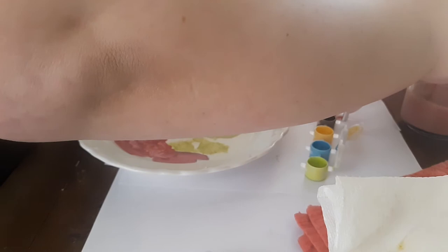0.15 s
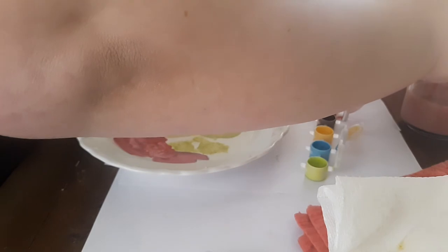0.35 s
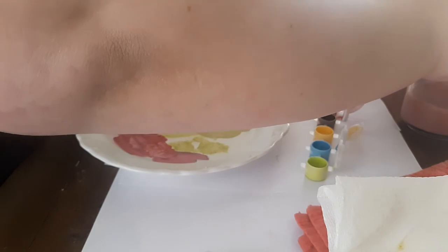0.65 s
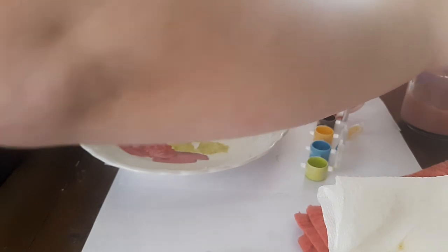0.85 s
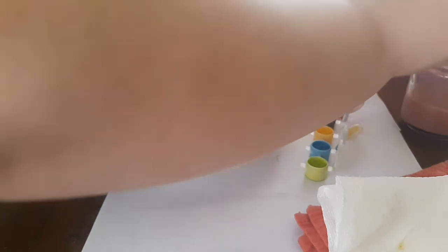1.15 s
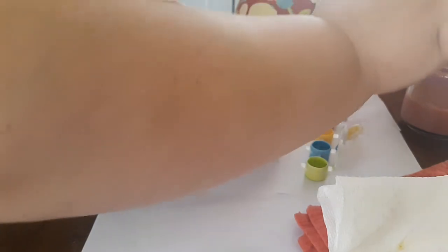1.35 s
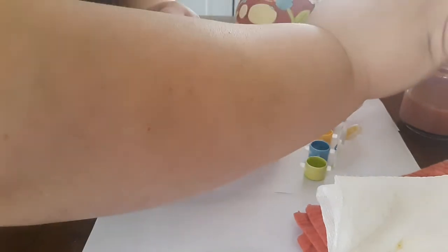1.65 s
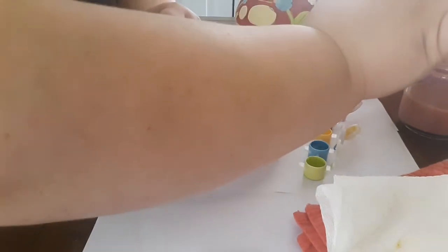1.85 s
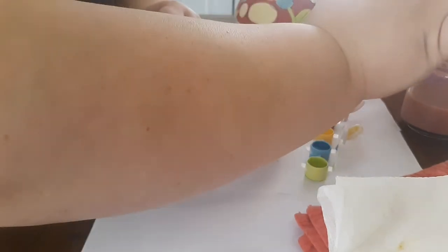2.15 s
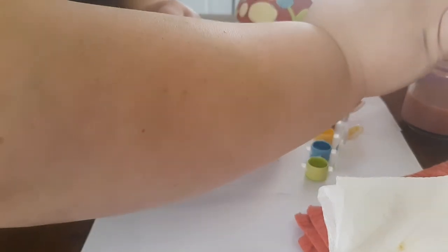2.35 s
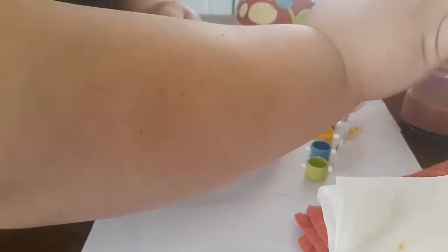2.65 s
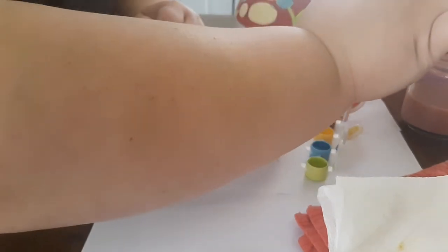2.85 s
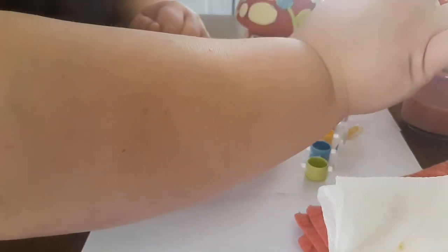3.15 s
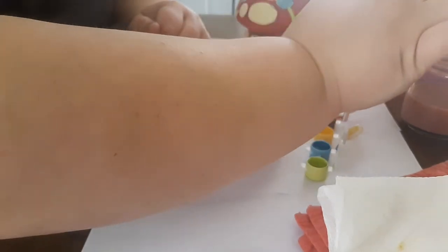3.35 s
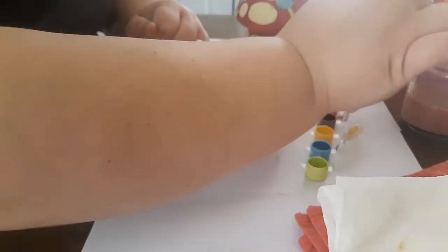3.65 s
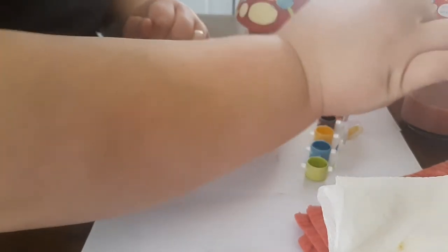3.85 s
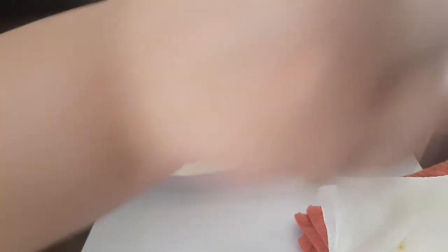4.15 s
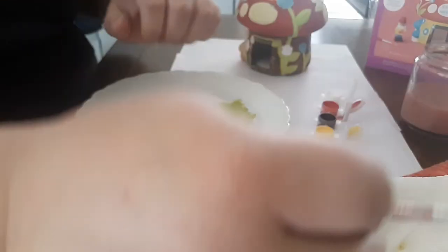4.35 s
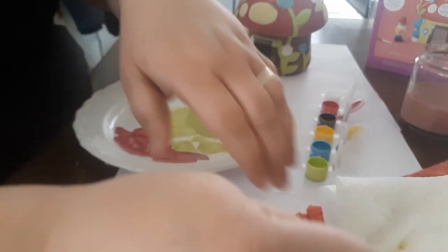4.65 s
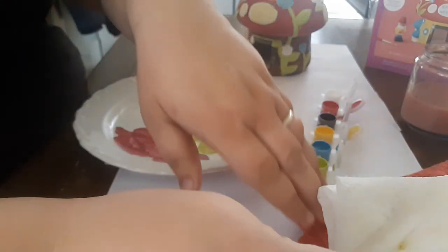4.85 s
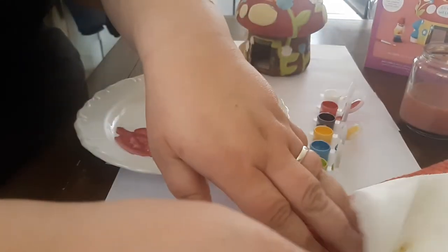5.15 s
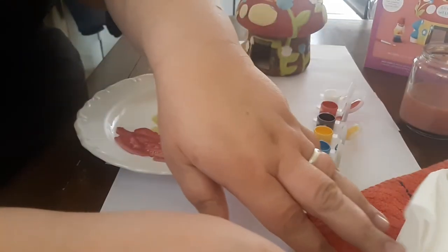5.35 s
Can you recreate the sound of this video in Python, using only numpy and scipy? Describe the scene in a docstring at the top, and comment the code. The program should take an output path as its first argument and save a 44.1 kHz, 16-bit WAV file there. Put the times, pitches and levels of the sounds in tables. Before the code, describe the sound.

Close to a phone in a small, quiet room, a brush swishes faintly in a jar of water. After a pause come six ringing taps on the glass rim, the last ones softer. A loud wooden knock follows, then duller bumps, a quick juddering of soft thuds, a low dragging rumble, a faint rubbing tone and light paper rustles.

```python
"""Rinsing a brush and bumping a table

A paintbrush swishes in a glass jar of rinse water (contact noise exciting wet modes and bubbles), then
taps the rim six times (decaying glass modes, a tick and a shaken table). Something put down knocks on the
wooden table (bending wave and modes); an arm bumps, judders and slides (pulses and shaped noise), and a
paper towel rustles (fluctuating noise). A phone close by hears it in a small, quiet room."""
import sys
import numpy as np
from scipy import signal
from scipy.fft import rfft, irfft
from scipy.io import wavfile
from scipy.ndimage import uniform_filter1d

SR = 44100
rng = np.random.default_rng(int(sys.argv[2]) if len(sys.argv) > 2 else 0)


def int16_out(signal):
    """Quantize to a 16-bit WAV file."""
    q = np.round(np.clip(np.atleast_2d(signal).T, -1, 1) * 32767)
    wavfile.write(sys.argv[1], SR, q.astype(np.int16))


N = 242753  # length in samples
TIME = np.arange(N) / SR
RING = TIME[:SR * 3 // 4]  # time axis of one decaying response, s

# Background spectrum of the room. Each row: frequency in Hz, relative level in dB.
ROOM_SPECTRUM = [(25, -20), (50, -5.5), (70, -0.5), (110, 0.5), (180, -2), (240, -6.5), (350, -6.5),
                 (430, -13.5), (550, -14), (750, -24.5), (1100, -26), (2000, -31), (5000, -31.5),
                 (15500, -35)]
ROOM_TONE_DB = -63
# Reverberation time of the room. Each row: frequency in Hz, t60 in s.
ROOM_DECAY = [(150, 0.41), (600, 0.25), (2500, 0.14), (9000, 0.22)]
TOP_HZ = 15800  # upper limit of the phone

# Brush strokes inside the jar. Each row: start in s, level in dB, bubble frequency in Hz, decay in s.
BRUSH_STROKES = [(0.009, -60, 1590, 0.017), (.165, -63, 2350, 0.018), (0.176, -67, 5290, 0.025),
                 (.189, -60.5, 2540, 0.0035), (0.2535, -47.5, 3080, 0.0027), (.370, -63.5, 3980, 0.036),
                 (0.4524, -53.5, 3140, 0.00043), (0.564, -70, 3420, 0.021), (0.626, -66, 4010, 0.023)]
# Jar and brush touching under water. Each row: nominal frequency in Hz, nominal level in dB, t60 in s.
WET_JAR_MODES = [(1060, -0.5, 0.038), (1510, -7.5, 0.068), (1960, -10.5, 0.035), (2410, -8, 0.017),
                 (3050, 11.5, 0.029), (3102, 7.5, 0.023), (3550, -14, 0.028), (3690, 0, 0.046),
                 (4140, -7, 0.059), (5400, -18, 0.0084), (6100, -16, 0.016)]

# Taps on the rim. Each row: start in s, level in dB, gain of the side modes in dB, gain of the top modes
# in dB, table shake in dB, time until the handle settles in s, dip on settling in dB.
RIM_TAPS = [(1.4696, -28.5, -1, 3, -4.5, 0.051, -1), (1.9159, -30.5, 12.5, 7.5, -3, 0.028, -2.5),
            (2.108, -29.5, 3, 2.5, -10, 0.034, -8), (2.4137, -31, 1, 8, -8.5, 0.081, -24),
            (3.0086, -35.5, 0.5, 8, -8, 0.0814, -29), (3.4291, -36.5, 4, 10, -2.5, 0.047, -9.5)]
# Ring of the jar, partly in close pairs that beat. Each row: nominal frequency in Hz, nominal level in dB,
# t60 in s, share of the side gain that depends on the spot struck (0 to 1).
GLASS_MODES = [(3254, -2, .26, 0), (3290, -19, .13, 0), (5017, -24, .13, .8), (6244, -25, .14, 0),
               (6755, -29, .13, 1), (6979, -23, .13, 1), (8432, -10, .15, 0), (8560, -22, .08, 0),
               (9904, -31, .13, .5), (10657, -17, .13, 0), (10690, -15, .13, .3)]
# Tick of the handle on the glass. Each row: frequency in Hz, relative level in dB.
TICK_SPECTRUM = [(150, -5.5), (400, -2), (800, -19), (1150, -6), (1700, -17), (3000, 0), (5000, -12.5),
                 (9000, -2.5), (11500, -9.5), (15000, -32)]

# Hard blows on the table. Each row: start in s, thud in dB, knock in dB, top of the knock in Hz, room in dB.
TABLE_BLOWS = [(3.5556, 19, -3.5, 4730, -10), (3.567, 3, -5.5, 1160, -4.5), (3.645, -0.5, -25, 1510, -8),
               (3.8489, 11.5, -5.5, 1530, -0.5), (4.1634, 5, -18.5, 2390, -7),
               (4.209, -16, -18, 2740, -4.5), (4.3519, 1, -12, 810, 0.5)]
# Ring of the table top. Each row: frequency in Hz, relative level in dB, t60 in s.
WOOD_MODES = [(136.8, -3.5, 0.34), (192.2, -1, 0.18), (231.7, 4.5, 0.15), (349.3, 4.5, 0.19),
              (383, -4, 0.16), (544.7, 0.5, 0.18), (720, 0, 0.18), (866, 5, 0.14), (1135, 13, 0.071),
              (1290, 10, 0.077), (2226, 7.5, 0.093), (2694, 14, 0.069), (4017, 6, 0.044)]
# Short ring of the thing put down. Each row: frequency in Hz, relative level in dB, t60 in s.
OBJECT_MODES = [(1980, -21, 0.019), (2260, -12, 0.028), (3757, 2.5, 0.018), (6380, -6, 0.0099)]
# Colour of a hard blow above its thud. Each row: frequency in Hz, relative level in dB.
KNOCK_SPECTRUM = [(750, 2), (1200, 0.5), (1700, -6), (2300, 0), (3000, 0), (3700, 0.5), (5000, -1.5),
                  (6500, 1), (9000, 5), (14000, -12)]
THUD_HZ = 216

# Spectrum of the dragging arm. Each row: frequency in Hz, relative level in dB.
DRAG_SPECTRUM = [(60, -20), (110, -8.5), (160, 1), (240, 2.5), (315, 0.5), (480, -5), (750, -22.5),
                 (1500, -38), (4000, -59)]
# Spectrum of rustling paper. Each row: frequency in Hz, relative level in dB.
PAPER_SPECTRUM = [(300, -26), (800, -6.5), (1250, 3.5), (1700, -2.5), (2500, -2), (5000, -6.5),
                  (7000, -10.5), (14000, -28)]
# The arm stays on the table from here on, with a steady rumble and a faint hiss of skin on paper.
DRAG_FROM_S, DRAG_ATTACK_S, DRAG_DB, SKIN_DB = 3.715, 0.095, -62, -81
# Shoves of the arm, swells of rumble. Each row: peak in s, level in dB, half length in s.
ARM_SHOVES = [(4.1, -58, 0.14), (5.34, -61, 0.2)]
# Wipes over paper and towel, swells of rustle. Each row: peak in s, level in dB, half length in s.
PAPER_WIPES = [(4.16, -69, 0.066), (4.95, -75.5, 0.043), (5.085, -68.5, 0.02), (5.4, -73, 0.065)]
# A faint rubbing tone grows as the hand slides, and dies when it stops.
RUB_FROM_S, RUB_TO_S, RUB_DB, RUB_GROWTH_DB_PER_S, RUB_RELEASE_S = 4.51, 4.82, -60, 31, 0.055

# The arm sticks and slips in a quick train of soft thuds. Each row: time in s, level in dB.
ARM_SLIPS = [(3.974, -29), (4.020, -25.5), (4.064, -36), (4.104, -31.5)]
# Scuff of skin on the table. Each row: frequency in Hz, relative level in dB.
SCUFF_SPECTRUM = [(60, -27), (150, -11.5), (380, 6.5), (750, -16), (1200, -16), (1700, -28.5), (5000, -40),
                  (14000, -63)]


def undb(db):
    """Level law: an amplitude gain is ten to the power of decibels over twenty."""
    return 10 ** (np.asarray(db) / 20)


def unit(x):
    """Normalisation: division by the root mean square gives unit power."""
    return x / np.sqrt(np.mean(x ** 2))


def fade(t60):
    """Exponential decay: the amplitude is 60 dB down after t60 seconds."""
    return np.exp(-np.log(1000) * RING / t60)


def on_log(hz, points):
    """Interpolation of (Hz, value) points on a logarithmic frequency axis."""
    f, value = np.transpose(points)
    return np.interp(np.log(np.maximum(hz, 1)), np.log(f), value)


def colour(x, points):
    """Minimum-phase filtering: a folded cepstrum turns a (Hz, dB) magnitude into a causal response."""
    size = 4096
    magnitude = undb(on_log(np.fft.rfftfreq(size, 1 / SR), points))
    cepstrum = irfft(np.log(magnitude))
    cepstrum[1:size // 2] *= 2
    cepstrum[size // 2 + 1:] = 0
    response = irfft(np.exp(rfft(cepstrum)))
    return signal.fftconvolve(x, response)[:len(x)]


def band(x, lo_hz, hi_hz):
    """Band limitation by a Butterworth band-pass."""
    edges = [lo_hz, min(hi_hz, SR / 2 - 1)]
    return signal.sosfilt(signal.butter(2, edges, "band", fs=SR, output="sos"), x)


def walk(rate):
    """Slow fluctuation: averaging stepped noise gives a smooth random wander of unit rms or nearly so."""
    k = max(int(SR / rate), 1)
    steps = np.repeat(rng.standard_normal(N // k + 1), k)
    return unit(uniform_filter1d(steps, k)[:N])


def add(track, s, sound):
    """Superposition: a sound is summed into a track from time s."""
    i = max(int(s * SR), 0)
    track[i:i + len(sound)] += sound[:N - i]


def ring(modes):
    """Modal sum of decaying sines from (Hz, dB, t60) rows; neighbours start in opposite directions."""
    total = 0
    for k, (hz, db, t60) in enumerate(modes):
        total = total + (-1) ** k * undb(db) * fade(t60) * np.sin(2 * np.pi * hz * RING)
    return total


def burst(seconds):
    """Random contact: a cluster of tiny impacts, of unit energy, dies by a factor e per given time."""
    x = rng.standard_normal(len(RING)) * np.exp(-RING / seconds)
    return x / np.linalg.norm(x)


def room(x, wet_db, build_s=0.0063):
    """Diffuse reverberation: direct sound joins a noise tail whose octaves each decay at their own rate."""
    tail = 0
    for hz in 80 * 2 ** np.arange(8):
        octave = band(rng.standard_normal(len(RING)), hz, 2 * hz)
        tail = tail + octave * fade(on_log(hz * np.sqrt(2), ROOM_DECAY))
    tail = tail * (1 - np.exp(-(RING / build_s) ** 2))
    return x + undb(wet_db) * signal.fftconvolve(x, tail / np.linalg.norm(tail))[:len(x)]


def table_top(travel_s=0.00414, ring_db=-55, low_hz=105, wave_top_hz=900):
    """Bending-wave dispersion: a dull wave arrives with its bass last, then the modes build up."""
    hz = np.fft.rfftfreq(len(RING), 1 / SR)
    # wave speed grows as the root of frequency; travel_s is the delay at the second mode
    phase = 4 * np.pi * travel_s * np.sqrt(WOOD_MODES[1][0] * hz)
    wave = irfft(np.exp(-1j * phase) / (1 + 1j * hz / wave_top_hz), len(RING))
    body = wave + undb(ring_db) * ring(WOOD_MODES) * (1 - np.exp(-RING / travel_s))
    return signal.sosfilt(signal.butter(4, low_hz, "high", fs=SR, output="sos"), body)


def swells(rows):
    """Power addition of bell-shaped gains from (peak s, dB, half length s) rows."""
    return np.sqrt(sum((undb(db) * np.exp(-((TIME - s) / half) ** 2 / 2)) ** 2 for s, db, half in rows))


def onset(s, attack_s):
    """Smooth transition: a hyperbolic tangent raises the gain from 0 to 1 around time s."""
    return (1 + np.tanh((TIME - s) / attack_s)) / 2


def background(waver_db=0.86, hiss_db=-79):
    """Ambient noise: a low rumble common to both channels, and a faint hiss of opposite sign in each."""
    level = undb(ROOM_TONE_DB + waver_db * walk(rate=5.78))
    rumble = unit(colour(rng.standard_normal(N), ROOM_SPECTRUM)) * level
    return rumble + undb(hiss_db) * rng.standard_normal(N) * np.array([[1], [-1]])


def rinsing(focus_db=8, swish_db=9, bubble_db=9, bubble_t60=0.015, slosh=0.025, scatter_db=3):
    """Noise-excited resonance: scraping drives the jar and small bubbles; sloshing shifts the modes."""
    out = np.zeros(N)
    for s, db, hz, length in BRUSH_STROKES:
        contacts = burst(length)
        modes = [(hz, bubble_db, bubble_t60)]
        for f, mode_db, t60 in WET_JAR_MODES:
            shifted_hz = f * (1 + slosh * rng.standard_normal())
            modes.append((shifted_hz, mode_db + scatter_db * rng.standard_normal(), t60))
        sound = signal.fftconvolve(contacts, ring(modes))[:len(RING)] + undb(swish_db) * contacts
        # each stroke is focused around its bubble frequency
        focus = [(hz / 4, -3 * focus_db), (hz / 2, -focus_db), (hz, 0),
                 (hz * 2, -focus_db), (hz * 4, -3 * focus_db)]
        sound = colour(sound, focus)
        # the stroke level is the rms of its energy spread over 10 ms
        add(out, s, undb(db) * sound / np.linalg.norm(sound) * np.sqrt(SR / 100))
    return room(out, wet_db=-6.5)


def rim_taps(tick_db=13.5, waver_db=1.65, rise_s=0.0025, settle_s=0.0014, recover_s=0.025,
             damp_after_s=0.094, damp_db_per_s=105, detune_hz=7.4):
    """Impact excitation: each tap ticks, rings the glass and shakes the table through the jar's foot."""
    glass, contact = np.zeros(N), np.zeros(N)
    foot = colour(table_top(), [(100, -9.5), (200, -1.5), (260, -2.5), (340, 6), (430, -14.5), (560, -6.5),
                                (800, -30), (1150, -22.5), (2000, -38.5), (6000, -55)])
    for s, db, side_db, top_db, shake_db, hold, dip_db in RIM_TAPS:
        # the moving water shifts the modes a little; a harder contact lifts the highest ones
        modes = []
        for hz, mode_db, t60, share in GLASS_MODES:
            lift_db = top_db * on_log(hz, [(8300, 0), (10500, 1.0)])
            shifted_hz = hz + detune_hz * rng.standard_normal()
            modes.append((shifted_hz, mode_db + share * side_db + lift_db, t60))
        # the ring dips as the handle settles back on the rim, and its tail is damped
        settled = (1 + np.tanh((RING - hold) / settle_s)) / 2
        dip = settled * np.exp(-(np.maximum(RING - hold, 0) / recover_s) ** 2)
        damping = damp_db_per_s * np.maximum(RING - damp_after_s, 0)
        # water slopping against the wall makes the ring waver
        waver = waver_db * walk(rate=100)[:len(RING)]
        level = undb(db + dip_db * dip - damping + waver)
        add(glass, s, level * (1 - np.exp(-RING / rise_s)) * ring(modes))
        tick = colour(burst(seconds=0.00069), TICK_SPECTRUM)
        add(contact, s, undb(db + tick_db) * tick + undb(shake_db) * foot)
    return room(glass, wet_db=-16) + room(contact, wet_db=-0.5)


def table_knocks(clack_db=-21, clack_growth=1.4, clatter_db=-1, chatter_db=-9, steepness=3.15):
    """Contact stiffness: blows thud and ring one table; the harder the contact, the higher the knock."""
    out, top = np.zeros(N), table_top()
    for s, thud_db, knock_db, top_hz, room_db in TABLE_BLOWS:
        contacts = undb(clatter_db) * burst(seconds=0.0047) + undb(chatter_db) * burst(seconds=0.011)
        thud = [(THUD_HZ / 3, thud_db - 7.5), (THUD_HZ, thud_db), (260, thud_db - 4.5),
                (350, thud_db - 5.5), (530, knock_db + 4.5)]
        knock = []
        for hz, db in KNOCK_SPECTRUM:
            rolloff_db = 10 * np.log10(1 + (hz / top_hz) ** (2 * steepness))
            knock.append((hz, db + knock_db - rolloff_db))
        # only a hard contact makes the thing itself ring
        hardness_db = on_log(OBJECT_MODES[2][0], knock)
        clack = undb(clack_growth * hardness_db + clack_db) * ring(OBJECT_MODES)
        blow = colour(top + band(contacts, 560, 15000), thud + knock)
        add(out, s, room(blow + clack, wet_db=room_db))
    return out


def sliding(rub_hz=559, wander_hz=9, grain_db=3, catch_db=3.0, table_db=-5):
    """Sliding friction: an uneven drag rubs up the table's resonances; paper fibres catch and slip."""
    drag = unit(colour(rng.standard_normal(N), DRAG_SPECTRUM)) * undb(0.92 * walk(rate=7.3))
    resonance = unit(signal.fftconvolve(drag, ring(WOOD_MODES))[:N])
    rumble = unit(drag + undb(table_db) * resonance)

    pitch_hz = rub_hz + wander_hz * walk(rate=87)
    tone = unit(np.sin(2 * np.pi * np.cumsum(pitch_hz) / SR) * undb(2.7 * walk(rate=45)))

    fibres = rng.standard_normal(N) * undb(grain_db * walk(rate=1500) + catch_db * walk(rate=66))
    paper = unit(colour(fibres, PAPER_SPECTRUM))

    touching = onset(DRAG_FROM_S, DRAG_ATTACK_S)
    weight = np.hypot(undb(DRAG_DB) * touching, swells(ARM_SHOVES))
    rustle = np.hypot(undb(SKIN_DB) * touching, swells(PAPER_WIPES))
    past_end = TIME - RUB_TO_S
    growth = undb(RUB_DB + RUB_GROWTH_DB_PER_S * np.minimum(past_end, 0))
    release = np.exp(-np.maximum(past_end, 0) / RUB_RELEASE_S)
    rub = onset(RUB_FROM_S, attack_s=0.017) * growth * release
    return rumble * weight + tone * rub + room(paper * rustle, wet_db=-7.0)


def judder(push_hz=175, table_db=-52, scuff_db=-20, scuff_s=0.0067, low_hz=70, ring_top_hz=1600):
    """Stick-slip: each slip pushes the table and lets it spring back, with a scuff and ringing low modes."""
    push = np.zeros(N)
    for s, db in ARM_SLIPS:
        p = (np.pi * push_hz * (TIME - s)) ** 2
        push += undb(db) * (1 - 2 * p) * np.exp(-p)  # a pulse with a dip on either side
    slips = swells([(s, db, scuff_s) for s, db in ARM_SLIPS])
    scuff = unit(colour(rng.standard_normal(N), SCUFF_SPECTRUM)) * slips
    force = band(push + undb(scuff_db) * scuff, low_hz, TOP_HZ)
    body = ring([mode for mode in WOOD_MODES if mode[0] < ring_top_hz])
    return room(force + undb(table_db) * signal.fftconvolve(force, body)[:N], wet_db=-10)


def scene():
    """Superposition of all sources, which lie straight ahead of the phone, on the background."""
    return background() + rinsing() + rim_taps() + table_knocks() + sliding() + judder()


def record(dry):
    """Band limitation: the phone cuts the top with a steep zero-phase low-pass."""
    return signal.sosfiltfilt(signal.ellip(8, .1, 60, TOP_HZ, fs=SR, output="sos"), dry)


dry = scene()
out = record(dry)
int16_out(out)
```